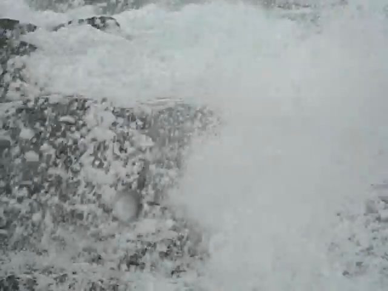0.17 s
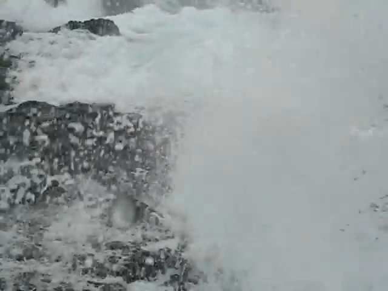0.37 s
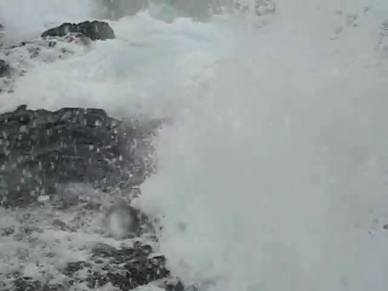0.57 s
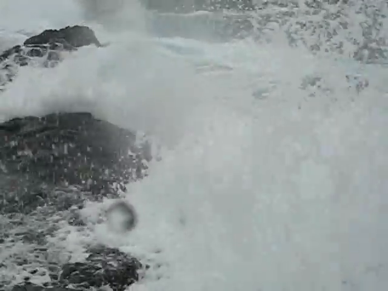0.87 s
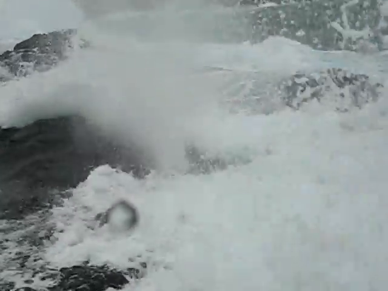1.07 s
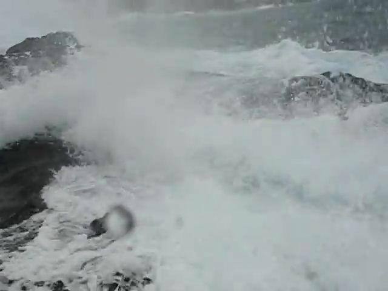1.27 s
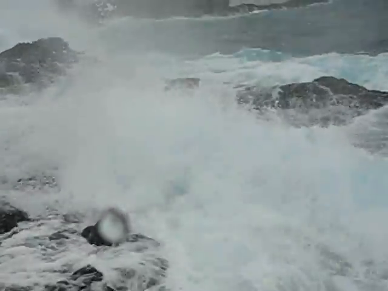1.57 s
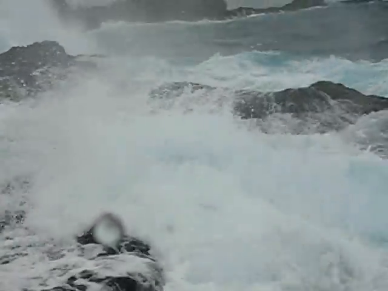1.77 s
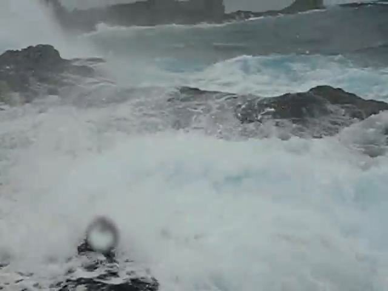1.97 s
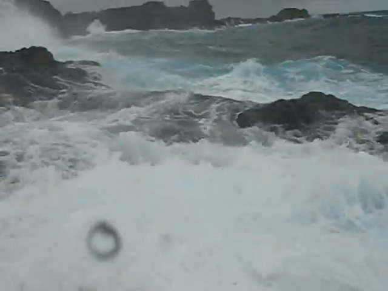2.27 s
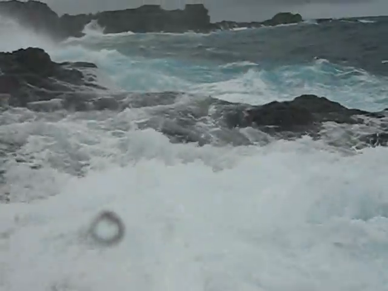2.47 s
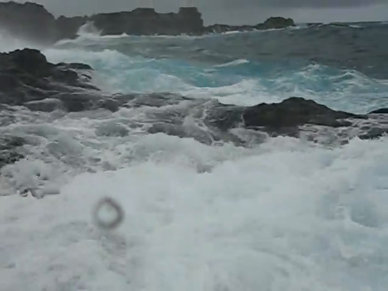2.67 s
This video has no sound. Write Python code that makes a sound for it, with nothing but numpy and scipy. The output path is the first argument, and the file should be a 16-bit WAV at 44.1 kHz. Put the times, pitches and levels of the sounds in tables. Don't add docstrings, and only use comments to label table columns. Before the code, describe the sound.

Sea spray crashes on coastal rocks, dense splatter and bright fizz over steady low surf roar. At 0.15 s a drop hits the microphone with a loud click and tiny ring; the volume drops abruptly, then slowly recovers. Heavy wet slaps cluster around 0.45 s and 1.2 s, continuing to 1.75 s. Spray thins to faint fizz by 2.5 s, then a weaker, duller splash falls near 2.7 s. Narrow, mono camera sound.

```python
import sys
import numpy as np
from scipy import signal
from scipy.io import wavfile
from scipy.ndimage import uniform_filter1d

SR = 44100
rng = np.random.default_rng(int(sys.argv[2]) if len(sys.argv) > 2 else 0)


def how_loud(loudness_db):
    steps = np.asarray(loudness_db, float) / 20
    return 10 ** steps


def transcribe(u):
    v = np.clip(np.atleast_2d(u).T, -1, 1)
    q = np.round(v * 32767).astype(np.int16)
    wavfile.write(sys.argv[1], SR, q)


N = 124362
T = np.arange(N) / SR

# (time [s], level [dB], brightness tilt [dB per octave])
SPRAY_SURGE = [(0, -28.5, -1), (.04, -28, 0), (0.121, -26.5, 3), (0.189, -26.5, 1), (.25, -24.5, -1),
               (.48, -28, 3.5), (.7, -28, 0.5), (.98, -29.5, .5), (1.1, -28, -1.9), (1.191, -26, -.5),
               (1.4, -28.5, 0), (1.6, -31, 0.1), (1.79, -32.5, -1.7), (1.851, -34.5, -2),
               (2.1, -37.5, -0.2), (2.549, -39, -1), (2.699, -35, -3), (2.82, -37.5, -2.5)]
# (frequency [Hz], density [dB per Hz])
FIZZ_SPECTRUM = [(60, -19), (400, -10), (900, -10), (1600, 1.5), (3000, -1), (5000, -0.5), (7000, -12.5)]

HIT_S, DUCK_S = .15404, .1588


def evened(x):
    return x / np.sqrt(np.mean(x ** 2) + 1e-20)


def read(points, hz):
    f, value = np.transpose(points)
    return np.interp(np.log(hz + 1), np.log(f + 1), value)


def coloured(x, gain_db):
    log_gain = np.log(how_loud(gain_db))
    full = np.concatenate([log_gain, log_gain[-2:0:-1]])
    taps = np.fft.ifft(np.exp(np.conj(signal.hilbert(full)))).real[:2048]
    return signal.oaconvolve(x, taps)[:len(x)]


def churn(shape, tilt, patchy_db, flicker_db, swell_db):
    frames = N // 128 + 5
    hz = np.fft.rfftfreq(512, 1 / SR)
    t = np.arange(frames) * 128 / SR
    real, imag, patches, wide = rng.standard_normal((frames, 257, 4)).T
    patches = evened(uniform_filter1d(uniform_filter1d(patches, 6, 0), 9, 1))
    flicker = evened(uniform_filter1d(uniform_filter1d(wide[:80], 50, 0), 3, 1))
    flicker = np.concatenate([flicker, np.tile(flicker[-1], (177, 1))])
    swell_hz = np.geomspace(6, 40, 30)
    swell = evened(sum(np.sin(2 * np.pi * (f * t + rng.random())) / np.sqrt(f) for f in swell_hz))
    lean = np.interp(t, T, tilt) * np.log2(hz / 2000 + .05)[:, None]
    motion = patchy_db * patches + flicker_db * flicker + swell_db * swell
    spectra = (real + 1j * imag) * how_loud(read(shape, hz)[:, None] + lean + motion)
    return evened(signal.istft(spectra, nperseg=512, noverlap=384)[1][:N])


def tone(hz, db):
    return how_loud(db) * np.sqrt(2) * np.sin(2 * np.pi * (hz * T + rng.random()))


def mains_hum():
    # (frequency [Hz], level [dB rms])
    hum_tones = [(60, -65), (120, -68)]
    return sum(tone(hz, db) for hz, db in hum_tones)


def surf_roar(surge_db):
    # (frequency [Hz], density [dB per Hz])
    roar_spectrum = [(25, -6.5), (60, -18), (150, -0.5), (400, 1), (800, -2), (1500, 0), (3000, -13.5),
                     (7000, -35)]
    level_db = -42 + 0.21 * (surge_db + 37.5)
    return how_loud(level_db) * churn(roar_spectrum, 0 * T, patchy_db=-0.08, flicker_db=0.56, swell_db=-0.17)


def drops():
    drops_per_s, spread_db = 4000, 1
    landed = rng.exponential(1, N), rng.random(N) < drops_per_s / SR
    size = how_loud(spread_db * np.minimum(landed[0], 3.5)) * landed[1]
    kind = rng.integers(0, 24, N)
    out = np.zeros(N)
    for k, hz in enumerate(np.geomspace(1300, 6500, 24)):
        turns = np.arange(0, 8, hz / SR)
        grain = np.sin(2 * np.pi * turns * (1 + 0.0051 * turns)) * turns * np.exp(-turns / 0.81)
        grain = grain * how_loud(read(FIZZ_SPECTRUM, hz)) * np.sqrt(hz / 2000)
        out += signal.oaconvolve(size * (kind == k), grain)[:N]
    return evened(out)


def spray(surge_db, tilt):
    drop_share = 0.38
    fizz = churn(FIZZ_SPECTRUM, tilt, patchy_db=0.6, flicker_db=1.1, swell_db=0.15)
    return how_loud(surge_db) * (np.sqrt(1 - drop_share) * fizz + np.sqrt(drop_share) * drops())


def splashes():
    # (time [s], peak level [dB])
    slap_times = [(0.0253, -14), (0.0734, -16), (0.384, -21.5), (0.4274, -14), (0.4678, -10.5),
                  (0.6997, -19), (0.7458, -18), (0.8096, -20), (0.8638, -19), (1.0264, -16.5),
                  (1.069, -27.5), (1.0938, -18), (1.171, -12.5), (1.2054, -16), (1.2326, -13.5),
                  (1.269, -19), (1.3855, -19), (1.6818, -15.5), (1.7414, -21.5), (2.5102, -27.5),
                  (2.5679, -28), (2.6914, -25.5)]
    # (frequency [Hz], density [dB per Hz])
    slap_spectrum = [(300, -25.5), (1000, -11), (2200, 1), (3500, -2.5), (7000, -11)]
    trim_db, t60_s, rise_s = -9, .09, .002
    bursts = np.zeros(N)
    for start, db in slap_times:
        u = T - start
        bursts += how_loud(db + trim_db - 60 * abs(u) / t60_s) * np.clip(u / rise_s, 0, 1)
    return bursts * churn(slap_spectrum, 0 * T, patchy_db=-0.5, flicker_db=0, swell_db=0.5)


def water():
    at, level_db, tilt = np.transpose(SPRAY_SURGE)
    surge_db = np.interp(T, at, level_db)
    return surf_roar(surge_db) + spray(surge_db, np.interp(T, at, tilt)) + splashes()


def housing(x):
    # (frequency [Hz], width [Hz], gain [dB])
    shell_modes = [(413, 80, 2.5), (616, 74, 4), (487, 54, -2), (906, 98, -4.5), (1417, 83, 3.5),
                   (1773, 61, 4), (2199, 244, 7), (2657, 200, -4.5), (3016, 130, -4), (3240, 160, 5),
                   (3580, 210, 4.5), (4214, 280, -4), (4610, 270, 3), (5525, 790, -6), (5830, 340, -2)]
    roll_hz, roll_db_per_khz = 6182, -42
    hz = np.fft.rfftfreq(4096, 1 / SR)
    bumps = sum(db * np.exp(-((hz - f) / width) ** 2) for f, width, db in shell_modes)
    over_khz = 200 * np.logaddexp(0, (hz - roll_hz) / 200) / 1000
    heard = coloured(x, np.maximum(bumps + roll_db_per_khz * over_khz, -90))
    return heard * np.std(x) / np.std(heard)


def strike():
    # (frequency [Hz], level [dB], t60 [s])
    port_rings = [(3480, -13, .022), (3170, -23, .05)]
    hit_db, hit_width_s, ring_delay_s, ring_rise_s = -1.9, .0001, .00024, .0003
    u = T - HIT_S
    punch = how_loud(hit_db) * np.exp(-(u / hit_width_s) ** 2)
    rings = np.zeros(N)
    for hz, db, t60 in port_rings:
        rings += how_loud(db - 60 * abs(u) / t60) * np.cos(2 * np.pi * hz * (u - ring_delay_s))
    onset = np.sin(np.pi / 2 * np.clip(u / ring_rise_s - .5, 0, 1)) ** 2
    return punch + rings * onset


def membrane_offset():
    u = T - HIT_S
    shift = np.clip(u / .004, 0, 1) * np.exp(-np.maximum(T - .5, 0) / .4)
    sag = np.clip(u / 0.0024, 0, 1) * np.exp(-abs(u) / .02)
    return -.005 - .0038 * shift - 0.0031 * sag


def gain_control():
    duck_db, snap_s, recover_s = -14.5, 0.00053, 0.44
    u = T - DUCK_S
    return duck_db * np.clip(1 + u / snap_s, 0, 1) * np.exp(-np.maximum(u, 0) / recover_s)


def scene():
    dip_start = np.clip((T - HIT_S) / 0.00031, 0, 1)
    dip_end = np.clip((T - DUCK_S) / .002, 0, 1)
    early_duck_db = -7 * dip_start * (1 - dip_end)
    return np.tile(housing(water()) * how_loud(early_duck_db) + strike(), (2, 1))


def top_cut(x):
    return signal.sosfilt(signal.butter(12, 7210, fs=SR, output="sos"), x)


def record(dry):
    ducked = (dry + tone(3404, -58)) * how_loud(gain_control())
    return top_cut(ducked + mains_hum() + membrane_offset())


dry = scene()
out = record(dry)
transcribe(out)
```